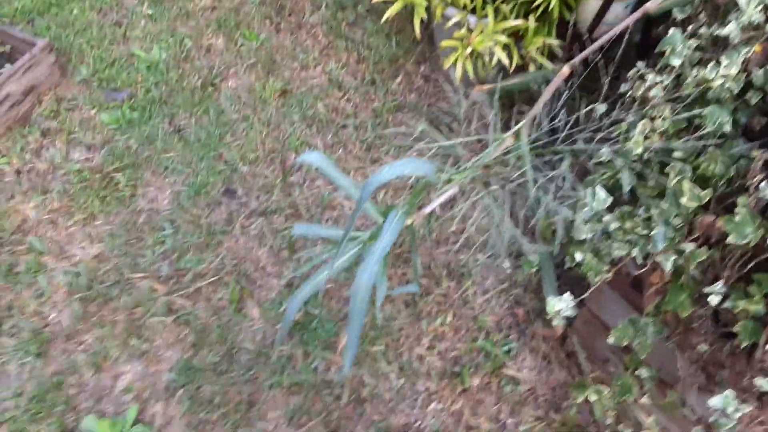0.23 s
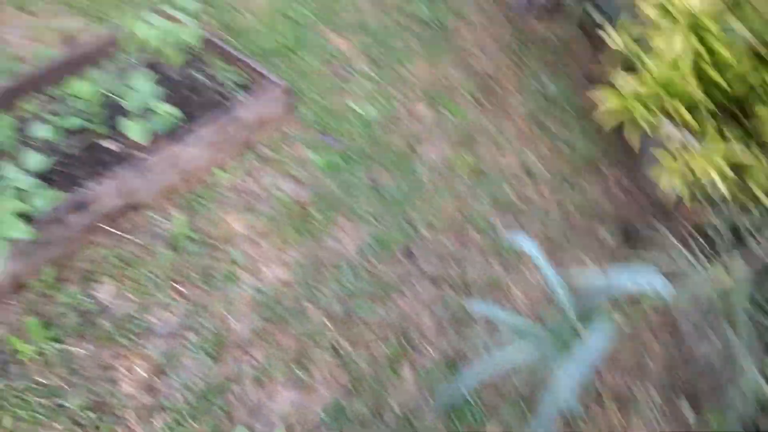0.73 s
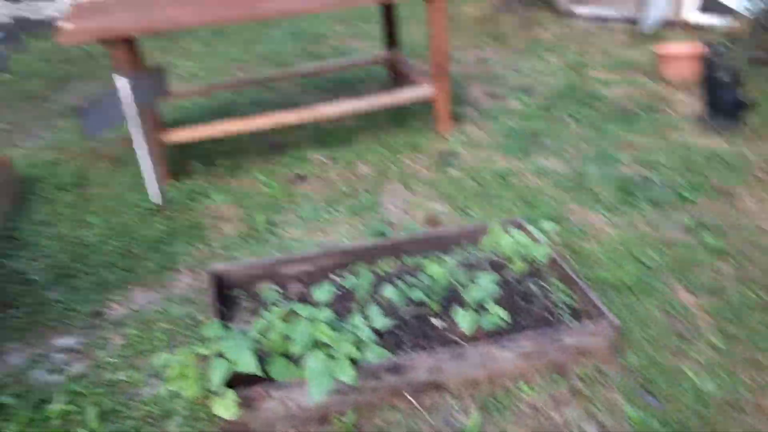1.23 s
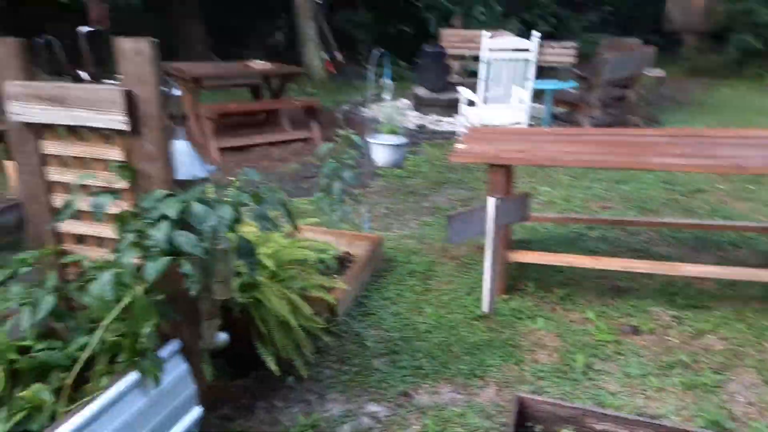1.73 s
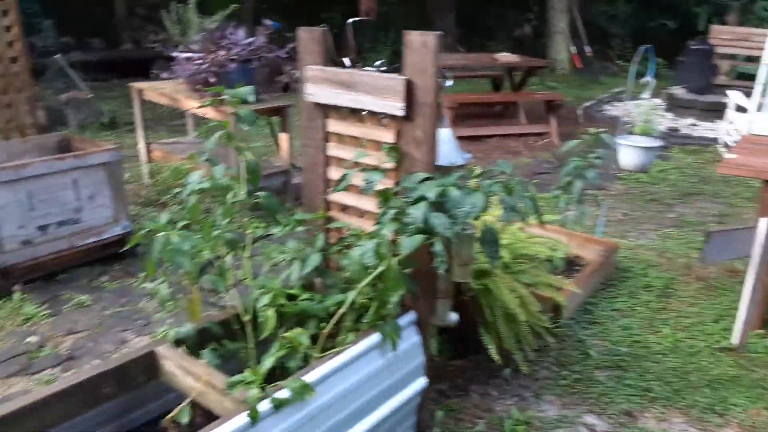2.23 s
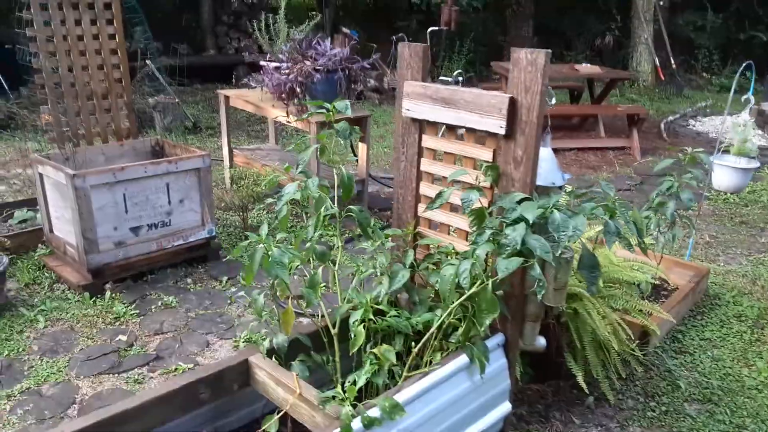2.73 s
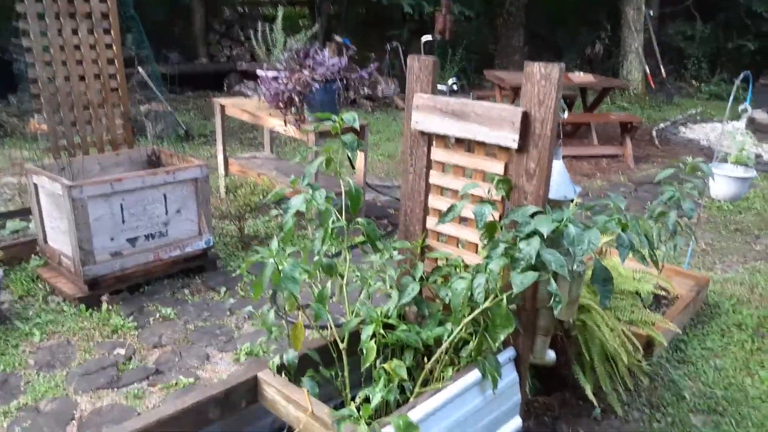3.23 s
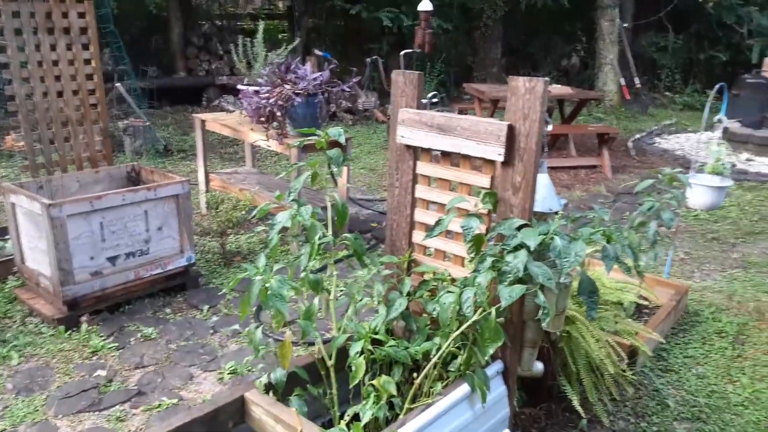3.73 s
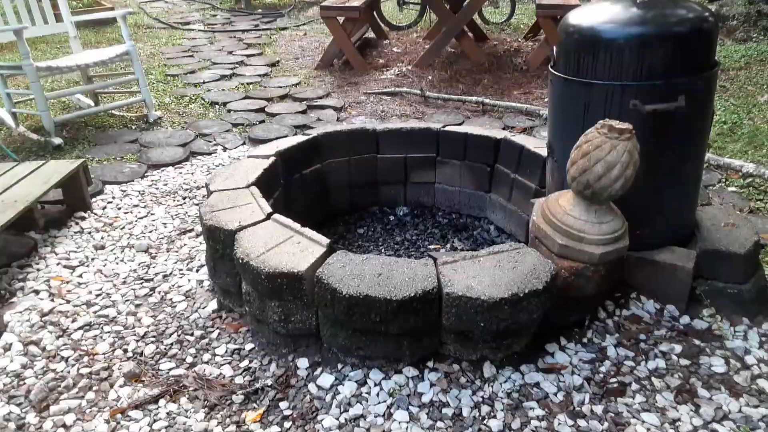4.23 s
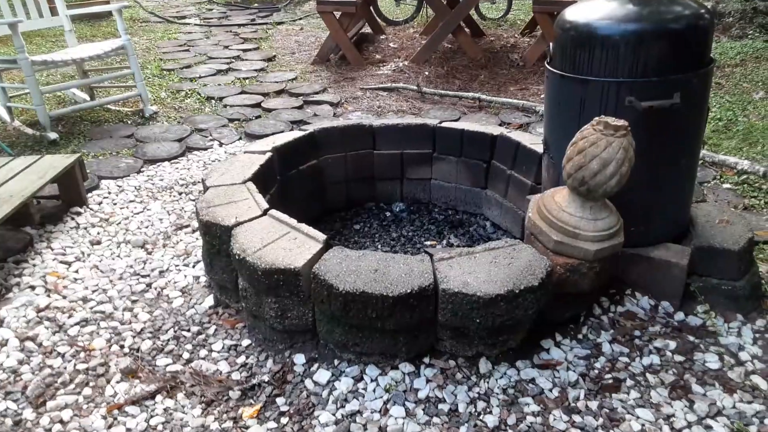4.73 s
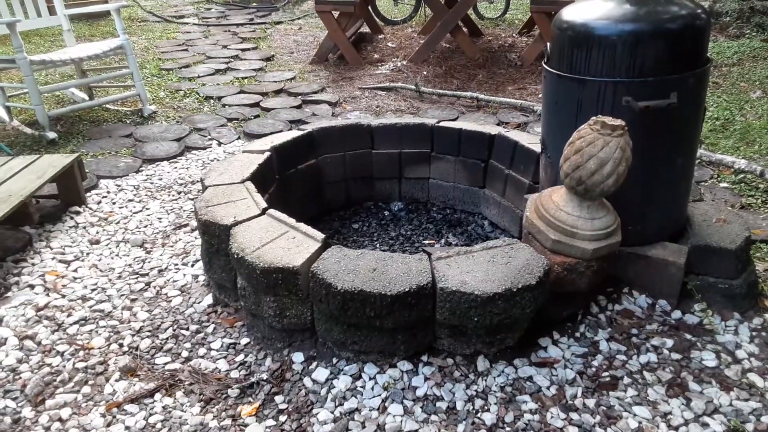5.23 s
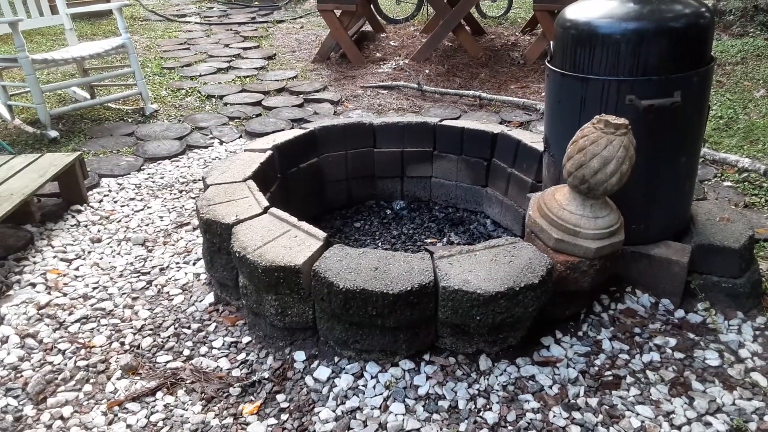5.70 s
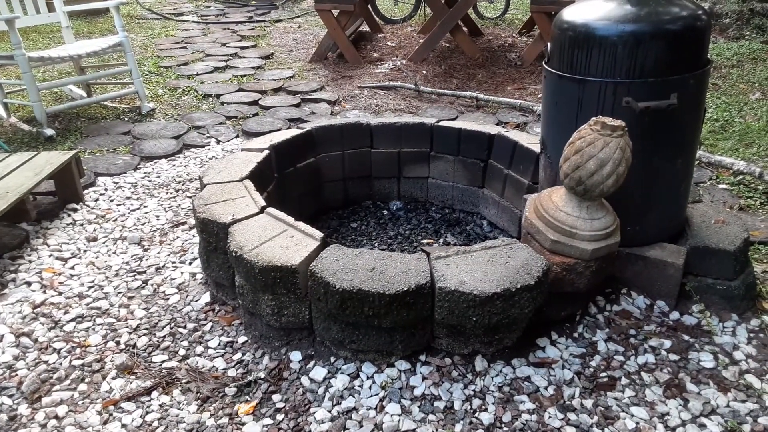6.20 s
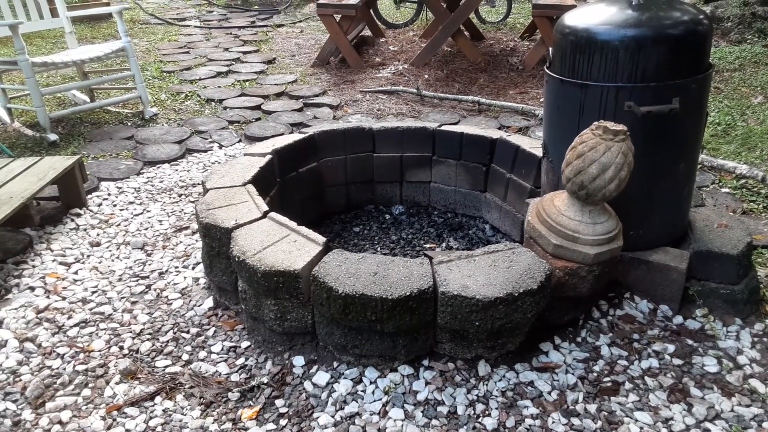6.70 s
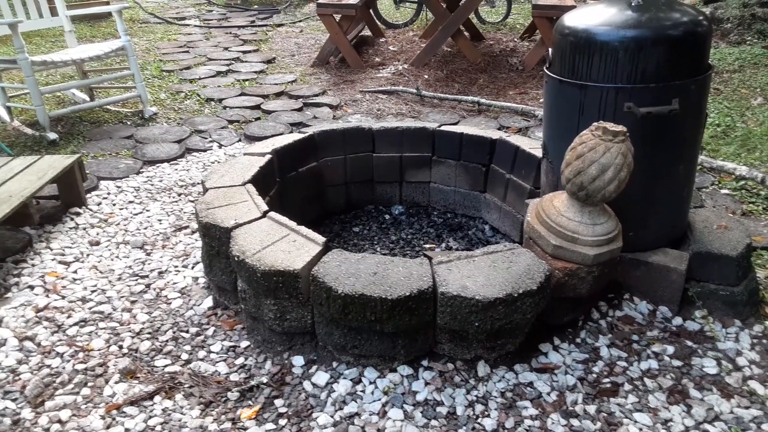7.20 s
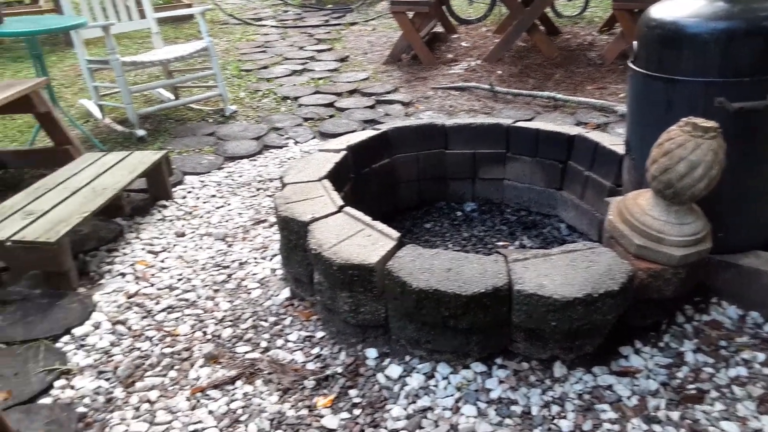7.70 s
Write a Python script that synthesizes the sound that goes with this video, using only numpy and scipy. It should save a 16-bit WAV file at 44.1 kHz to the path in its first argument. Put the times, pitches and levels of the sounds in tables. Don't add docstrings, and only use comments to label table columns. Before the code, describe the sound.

A garden with a continuous, very high insect trill, a thinner katydid buzz above it, and soft far traffic rumble and hum. A small bird gives clusters of squeaky notes and sharp rising chips, echoed by trees, with brief wing hisses. A handheld microphone picks up dull knocks and grainy scuffs, mostly in the first half. Just after four seconds the place switches abruptly: insects and bird become louder, handling nearly stops, and a distant cricket rasps twice.

```python
import sys
import numpy as np
from scipy import signal
from scipy.fft import rfft, irfft, next_fast_len
from scipy.io import wavfile
from scipy.ndimage import uniform_filter1d

SR = 44100
rng = np.random.default_rng(int(sys.argv[2]) if len(sys.argv) > 2 else 0)


def dump(signal):
    limited = np.clip(np.atleast_2d(signal).T, -1, 1)
    pcm = np.round(limited * 32767).astype(np.int16)
    wavfile.write(sys.argv[1], SR, pcm)


def voltage_ratio(level):
    return 10 ** (np.asarray(level, float) / 20)


N = 350595
CUT_S = 4.229


def evened(x):
    return x / np.sqrt(np.mean(x ** 2) + 1e-20)


def read(points, hz):
    f, value = np.transpose(points)
    return np.interp(np.log(hz + 1), np.log(f + 1), value)


def along(tables, column):
    rows = np.concatenate(tables)
    return np.interp(np.arange(N) / SR, rows[:, 0], rows[:, column])


def drifting(levels_db):
    # start_s, end_s
    spots_s = [(0, 4.226), (4.232, 7.95)]
    return np.interp(np.arange(N) / SR, np.ravel(spots_s), levels_db)


def panned(x, lean_db):
    return np.array([x * voltage_ratio(lean_db / 2), x * voltage_ratio(-lean_db / 2)])


def add(mix, start_s, sound):
    part = mix[:, round(start_s * SR):][:, :sound.shape[1]]
    part += sound[:, :part.shape[1]]


def wash(colour, patchy_db):
    # freq_hz, correlation
    likeness = [(60, 1), (130, 0.82), (290, 0.66), (640, 0.35), (1410, -0.22), (3100, 0.047), (6820, -0.45),
                (15000, 0.17)]
    # freq_hz, left_right_db
    balance = [(60, 3), (180, 4), (550, 2), (1650, 3), (4970, -1.5), (15000, 3)]
    frames, hz = N // 512 + 5, np.fft.rfftfreq(2048, 1 / SR)
    a, b, c, d, patches = rng.standard_normal((frames, 1025, 5)).T
    patches = uniform_filter1d(patches, size=16, axis=0)
    patches = evened(uniform_filter1d(patches, size=8, axis=1))
    same = np.clip(read(likeness, hz), -1, 1)[:, None]
    left = a + 1j * b
    right = same * left + np.sqrt(1 - same ** 2) * (c + 1j * d)
    z = np.array([left, right])
    z *= panned(colour(hz), read(balance, hz))[:, :, None] * voltage_ratio(patchy_db * patches)
    x = signal.istft(z, nperseg=2048, noverlap=1536)[1][:, :N]
    return x / np.sqrt(np.mean(x.mean(0) ** 2))


def fuzzy(hz, width_hz):
    r = np.exp(-np.pi * width_hz / SR)
    drift = rng.standard_normal(N) + 1j * rng.standard_normal(N)
    drift = signal.lfilter([1], np.convolve([1, -r], [1, -r]), drift)
    return evened((drift * np.exp(2j * np.pi * hz * np.arange(N) / SR)).real)


def traffic_rumble():
    # time_s, level_db
    swell = [
        [(0.0, -57), (0.09, -51.5), (0.66, -52), (0.78, -56.5), (2.52, -53), (2.74, -67), (2.77, -51.5),
         (4.19, -50), (4.23, -54)],
        [(4.23, -49), (4.24, -51.5), (5.47, -51.5), (5.64, -53.5), (5.9, -48), (6.23, -52.5), (6.47, -50),
         (7.93, -55), (7.95, -61)],
    ]
    # freq_hz, density_db_per_hz
    spectrum = [(13, -37), (30, -40), (65, 3), (100, 4.5), (170, -8), (260, -8.5), (420, -28), (730, -23.5),
                (1500, -41), (1950, -41), (3300, -120)]
    noise = wash(lambda hz: voltage_ratio(read(spectrum, hz)), patchy_db=1.0)
    return voltage_ratio(along(swell, column=1) + 3.5) * noise


def air():
    # freq_hz, density_db_per_hz
    spectrum = [(400, 9.5), (900, 5), (1500, 0), (3000, -4.5), (4300, -3.5), (4900, -1.5), (6900, -18),
                (7500, 1), (9700, -7.5), (13500, -9.5), (16000, -10)]
    # first_start_db, first_end_db, second_start_db, second_end_db
    level_db = (-60, -64, -64, -63)
    return voltage_ratio(drifting(level_db) + 5) * wash(lambda hz: voltage_ratio(read(spectrum, hz)), patchy_db=1.56)


def engine_hum():
    # nearest_s, level_db, half_length_s
    passes = [(0.02, -46, 0.1), (.9, -56, 0.75), (2.0, -57, 0.069), (2.9, -59, 0.34), (3.8, -54.5, 0.09),
              (4.3, -48, 0.089), (4.47, -42.5, 0.17), (4.98, -46, 0.28), (5.3, -47, 0.15),
              (5.8, -49.5, 0.37), (6.5, -57, 0.17), (7.5, -50.5, 0.56)]
    # pitch_hz, width_hz, first_spot_db, second_spot_db
    lines = [(215.3, 4.8, -57, -62), (286.7, 34, -66.5, -66), (200.2, 100, -59, -52),
             (3930, 270, -82, -77.5)]
    t = np.arange(N) / SR
    drone = voltage_ratio(-59.5) + sum(voltage_ratio(db) * np.exp(-((t - s) / half_s) ** 2) for s, db, half_s in passes)
    hum = drone * fuzzy(125, 54.5)
    for hz, width_hz, first_db, second_db in lines:
        hum += voltage_ratio(np.where(t < CUT_S, first_db, second_db)) * fuzzy(hz, width_hz)
    return panned(hum, 2.9)


def tick_train(rate_hz, near_db, size):
    train = np.zeros(N)
    for j, (pace, start) in enumerate(rng.random((size, 2))):
        detune = .012 * (pace - .5) + .25 * (j > 1) * (pace - .5)
        s = (np.arange(9 * 90) + start) / (rate_hz * (1 + detune))
        at = (SR * s + rng.normal(0, 45, len(s))).astype(int)
        loud = voltage_ratio(near_db * (j == 0) + 1.05 * rng.standard_normal(len(s)))
        inside = (at >= 0) & (at < N)
        np.add.at(train, at[inside], loud[inside])
    return train


def swarm(pitch_hz, spread_hz, width_hz, rate_hz, near_db, count=7, size=4):
    f, out = np.fft.rfftfreq(next_fast_len(N), 1 / SR), np.zeros((2, N))
    for ear in range(2):
        z = 0
        for k, off in enumerate(np.linspace(-2, 2, count)):
            train = tick_train(rate_hz, near_db * (k == count // 2), size)
            away = (f - pitch_hz - off * spread_hz) / width_hz
            skirt = 0.11 * np.exp(-(away + 0.49) ** 2 / 14)
            burst = np.exp(-off ** 2 / 4) * (np.exp(-away ** 2 / 4) + skirt)
            z = z + rfft(train, 2 * len(f) - 2) * burst
        out[ear] = evened(irfft(z)[:N])
    return out * np.sqrt(2)


def chorus():
    # time_s, trill_db, left_right_db
    facing = [
        [(0.0, -50, -2), (0.02, -56.5, -7), (0.29, -55, -4), (1.54, -53.5, -6.5), (1.81, -54.5, -2),
         (3.45, -52.5, -4.5), (4.23, -52, -3.5)],
        [(4.23, -42.5, -3.5), (4.29, -45.5, -4.0), (5.62, -46, -4), (5.73, -45.5, -4.0), (7.16, -45.5, -5),
         (7.92, -46.5, -4), (7.95, -47, -4.5)],
    ]
    # first_start_db, first_end_db, second_start_db, second_end_db
    octave_db = (-15.5, -15, -12.5, -12)
    # first_start_db, first_end_db, second_start_db, second_end_db
    katydid_db = (-59.5, -63, -66.5, -68)
    trill_db, lean_db = along(facing, column=1) + 1.8, along(facing, column=2)

    def placed(level_db, lean_share, sound):
        return voltage_ratio(level_db) * panned(np.ones(N), lean_share * lean_db) * sound

    trill = swarm(pitch_hz=5917, spread_hz=162, width_hz=234, rate_hz=82, near_db=1.05)
    octave = swarm(pitch_hz=11770, spread_hz=390, width_hz=304, rate_hz=82, near_db=2.2)
    katydids = swarm(pitch_hz=8686, spread_hz=200, width_hz=112, rate_hz=59.5, near_db=3.4)
    out = placed(trill_db, 1.05, trill)
    out += placed(trill_db + drifting(octave_db), .3, octave)
    return out + placed(drifting(katydid_db), .9, katydids)


def knocks():
    # start_s, peak_db, left_right_db, ring_cycles, tick_db
    blows = [(0.202, -40.5, 10, 3.7, -8), (.449, -49, 15, 4.8, -17), (1.205, -54, 2, 1.6, 9),
             (1.4625, -34.5, 8.5, 1.5, -6), (2.0806, -35.5, 19.5, 2.75, -28),
             (3.1477, -30.5, 11.5, 2.02, -15), (3.287, -34, 7, 1.95, -26), (3.305, -34.5, 5, 2.9, -24),
             (4.111, -39.5, 17, 1.9, 3.5), (4.196, -48, 3, 2.2, -5), (4.971, -44, 28, 3.7, -30)]
    body_hz = 296
    out, t = np.zeros((2, N)), np.arange(3000) / SR
    turns = body_hz * t + 0.68 * (1 - np.exp(-t / 0.00088))
    for s, db, lean_db, cycles, tick_db in blows:
        u = np.minimum(t * body_hz / cycles, 1)
        swell = np.sin(np.pi * u ** (0.18 + 0.11 * cycles)) ** 2.0
        body = np.sin(2 * np.pi * turns) * swell * voltage_ratio(-14 * u / cycles)
        tick_noise = uniform_filter1d(rng.standard_normal((2, len(t))), size=4)
        tick = voltage_ratio(tick_db + 3 - 60 * t / 0.0058) * tick_noise
        knock = panned(body, lean_db)
        knock[1] = np.roll(knock[1], 28)
        add(out, s, voltage_ratio(db + 6.0) * (knock + tick))
    return out


def scuffs():
    # strongest_s, level_db, brightness_db_per_octave, rise_s, fade_s
    strokes = [(.452, -48.5, -6.5, 0.0073, 0.024), (.598, -54.5, -7, 0.01, 0.14),
               (.966, -52.5, -5, 0.018, 0.043), (1.05, -56, -4, 0.1, .15), (1.208, -54.5, -4, .045, 0.043),
               (1.3, -59.5, -10.5, 0.096, 0.025), (1.463, -48.5, -8.5, 0.014, 0.057),
               (1.737, -45.5, -9, 0.03, 0.04), (1.78, -50.5, -7.5, .045, 0.068),
               (1.984, -55, -4, .06, 0.14), (2.078, -51.5, -7.5, 0.037, 0.16),
               (2.25, -56.5, -2.5, 0.071, 0.055), (3.3, -45, -6, 0.021, .03),
               (3.317, -48.5, -3, 0.024, 0.017), (4.112, -57, -13, .013, 0.027),
               (4.99, -47.5, -9.5, 0.043, 0.032), (7.427, -53.5, -3.5, .005, .009)]
    edge_db, roundness = -21.5, 1.16
    out = np.zeros((2, N))
    clumps = voltage_ratio(4.5 * evened(uniform_filter1d(rng.standard_normal(N), size=90)))
    grains = rng.standard_normal((2, N)) * clumps
    grains[1] = 0.18 * grains[0] + 0.83 * grains[1]
    hz, frame_s, z = signal.stft(evened(grains), SR, nperseg=256)
    octaves = np.log2(np.maximum(hz, 250) / 1200)[:, None]
    bass_cut = 1 / (1 + (170 / (hz[:, None] + 1)) ** 2)
    for s, db, tilt_db, rise_s, fade_s in strokes:
        away = np.where(frame_s < s, (s - frame_s) / rise_s, (frame_s - s) / fade_s)
        inside = away < 1
        shape_db = edge_db * np.minimum(away, 1) ** roundness
        gain = voltage_ratio(db + 10 + shape_db + tilt_db * octaves) * inside * bass_cut
        first = np.argmax(inside)
        part = (z * gain)[:, :, first - 1:first + inside.sum() + 1]
        add(out, frame_s[first - 1], signal.istft(part, SR, nperseg=256)[1])
    return out


def far_cricket():
    # start_s, level_db, pitch_hz, length_s
    chirps = [(5.6995, -53, 3550, 0.086), (6.679, -53, 3526, 0.096)]
    out = np.zeros((2, N))
    for s, db, hz, length_s in chirps:
        t = np.arange(5400)[:round(length_s * SR)] / SR
        pulses = (.3 + np.sin(np.pi * 47 * t) ** 6) * signal.windows.tukey(len(t), .7)
        rasp = evened(uniform_filter1d(rng.standard_normal((2, 5400)), size=50))[:, :len(t)]
        add(out, s, voltage_ratio(db) * pulses * np.sin(2 * np.pi * hz * t + 0.59 * rasp))
    return out


def flutters():
    # start_s, level_db, length_s
    hisses = [(.2, -48, .012), (0.287, -46, 0.04), (.375, -46, .055), (3.92, -50, 0.05),
              (4.055, -58, 0.046), (4.157, -52, 0.049), (6.703, -60, .004), (6.8, -54, .004)]
    out = np.zeros((2, N))
    for s, db, length_s in hisses:
        hiss = evened(np.diff(rng.standard_normal((2, 4002)), 2))[:, :round(length_s * SR)]
        add(out, s, voltage_ratio(db) * hiss * signal.windows.tukey(hiss.shape[1], .5))
    return out


def note(db, upper_hz, lower_hz, length_s, lower_db):
    blends = [(2, -1), (0, 2), (1, 1), (-1, 3)]
    blends_db = [-12.5, -6, -8, -10]
    t = np.arange(4000)[:round(length_s * SR)] / SR
    wobble = [evened(w)[:len(t)] for w in uniform_filter1d(rng.standard_normal((4, 4000)), size=110)]
    lower_db = lower_db + 8.5 * (upper_hz - 8050) / 1000
    joined = np.minimum(t / 0.013, 1) ** 2
    slide = 1.012 - 0.0689 * np.exp(-t / 0.01506)
    upper = 2 * np.pi * np.cumsum(upper_hz * (slide + 0.0019 * wobble[0])) / SR
    lower = 2 * np.pi * np.cumsum(lower_hz * (slide + 0.0075 * wobble[1])) / SR
    mixed = voltage_ratio(lower_db + 4.5 * wobble[3]) * np.cos(lower)
    for (a, b), level_db in zip(blends, blends_db):
        mixed += voltage_ratio(level_db + 1.74 * lower_db) * np.cos(a * upper + b * lower)
    voices = voltage_ratio(2.27 * wobble[2]) * np.cos(upper) + joined * mixed
    return voltage_ratio(db - 4) * voices * signal.windows.tukey(len(t), .45)


def chip(db, length_s, hook_s, start_db):
    t = np.arange(0, length_s, 1 / SR)
    u = t / length_s
    hook_hz = 1754 * (1 - np.exp(-t / hook_s))
    flick_hz = 1445 * u ** 2.6
    turn = 2 * np.pi * np.cumsum(5770 + hook_hz + flick_hz) / SR
    level_db = db + np.interp(u, [0, 0.52, 1], [start_db, 0, -6.5])
    octave = voltage_ratio(-14 - .9 * start_db - 860 * t) * np.sin(2 * turn)
    return voltage_ratio(level_db + 8.5) * (np.sin(turn) + octave) * signal.windows.tukey(len(t), .14)


def trees(x):
    # freq_hz, t60_s
    decay = [(3000, 0.41), (7000, 0.56), (9000, 0.46), (15000, 0.32)]
    taps = np.zeros((2, SR))
    at = np.arange(200, SR - 20, 20) + rng.integers(0, 20, (2, (SR - 201) // 20))
    np.put_along_axis(taps, at, rng.standard_normal(at.shape), 1)
    hz, t, z = signal.stft(taps, SR, nperseg=256)
    z *= voltage_ratio(-60 * t / read(decay, hz)[:, None]) * (1 - np.exp(-t / 0.0052))
    tail = signal.istft(z, SR, nperseg=256)[1]
    return signal.fftconvolve(x, np.tile(tail, (2, 1)) / np.linalg.norm(tail[0]), axes=1)[:, :N]


def bird():
    # start_s, level_db, upper_hz, lower_hz, length_s
    squeaks = [(0.21, -41, 8220, 6880, 0.056), (0.285, -35, 8500, 7160, 0.042),
               (0.356, -36, 8280, 7220, 0.065), (1.46, -38, 8140, 6800, 0.031),
               (1.533, -42, 8200, 7100, 0.058), (1.616, -51, 8200, 6860, 0.074),
               (1.677, -48, 7910, 7250, 0.055), (2.982, -42, 8100, 7240, 0.024),
               (3.041, -36.5, 8220, 7060, 0.05), (3.1365, -34.5, 8290, 6990, 0.053),
               (3.836, -40.5, 8040, 7100, 0.074), (3.935, -37, 8110, 7340, 0.053),
               (4.061, -38, 7970, 7130, 0.065), (4.154, -40.5, 7900, 7200, 0.051),
               (4.219, -32.5, 8170, 7210, 0.038), (4.312, -31.5, 8320, 7100, 0.049),
               (5.621, -34, 8110, 7130, 0.044), (5.69, -30.5, 8350, 6760, 0.058),
               (5.781, -34.5, 8330, 6890, 0.066), (5.92, -31.5, 8220, 6820, 0.06),
               (6.011, -29, 8080, 6860, 0.039), (7.069, -35, 8030, 7000, 0.038),
               (7.163, -36, 8250, 7080, 0.046), (7.269, -35, 8400, 7050, 0.019)]
    # start_s, level_db, length_s, hook_s, start_db
    chips = [
        (0.5735, -36.5, .0405, 0.0042, -10),
        (3.678, -37.5, 0.036, 0.0067, -10),
        (5.733, -31.5, .04, 0.0081, -4.5),
    ]
    # time_s, left_right_db, lower_voice_db
    posture = [(0.3, -4, -6.5), (1.5, -6.5, -7), (3.05, -0.5, -8), (3.95, -2, -9), (4.25, -8, -9.5),
               (5.8, -6.5, -7), (7.2, -6.5, -8.5)]
    direct, bounces = np.zeros((2, 2, N)), np.zeros((2, N))
    posture_s, *postures_db = np.transpose(posture)
    for s, *voice in squeaks:
        lean_db, lower_db = (np.interp(s, posture_s, column) for column in postures_db)
        add(direct[int(s > CUT_S - .03)], s - .004, panned(note(*voice, lower_db), lean_db))
    for s, *call in chips:
        whistle = chip(*call)
        add(direct[int(s > CUT_S)], s, panned(whistle, -6.0))
        add(bounces, s + 0.0014, voltage_ratio(-5) * panned(whistle, -2))
        add(bounces, s + 0.0017, voltage_ratio(-6.5) * panned(whistle, -8))
    direct[:, 0] = np.roll(direct[:, 0], 4, axis=1)
    return direct, bounces


def calls_among_trees():
    direct, bounces = bird()
    direct[1] += far_cricket()
    echoes = voltage_ratio(-2.5) * trees(direct.reshape(4, N)).reshape(2, 2, N)
    return bounces + np.where(np.arange(N) < CUT_S * SR, *(direct + echoes))


def scene():
    background = traffic_rumble() + air() + engine_hum() + chorus()
    return background + knocks() + scuffs() + flutters() + calls_among_trees()


def band_limit(x):
    return signal.sosfilt(signal.butter(12, 15800, fs=SR, output="sos"), x)


def record(dry):
    low_cut = signal.butter(4, 48, "highpass", fs=SR, output="sos")
    return band_limit(signal.sosfilt(low_cut, dry))


dry = scene()
out = record(dry)
dump(out)
```